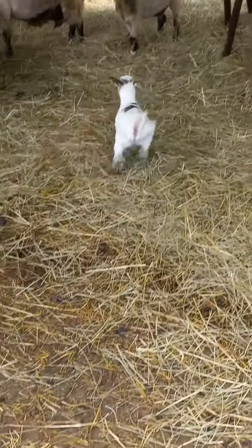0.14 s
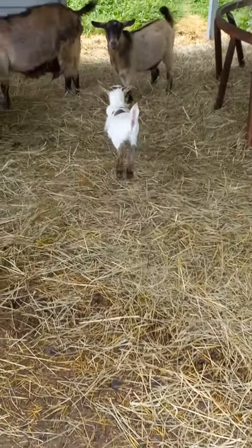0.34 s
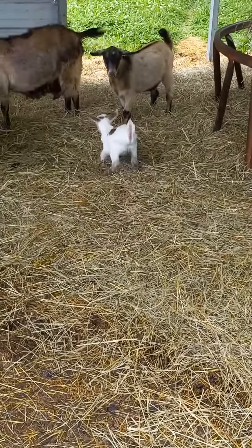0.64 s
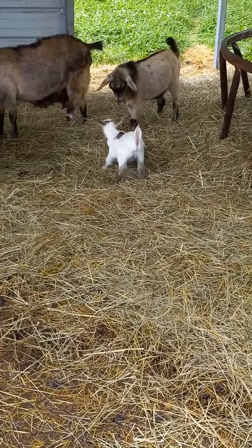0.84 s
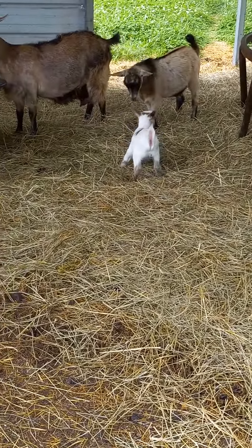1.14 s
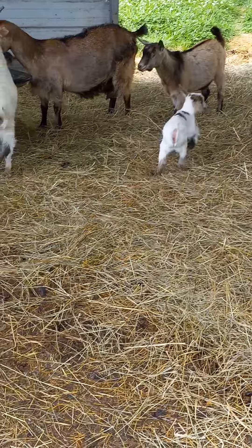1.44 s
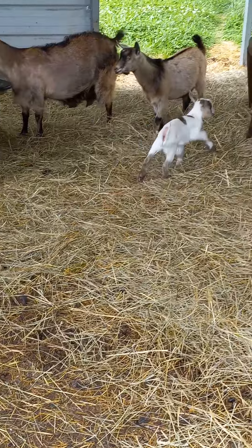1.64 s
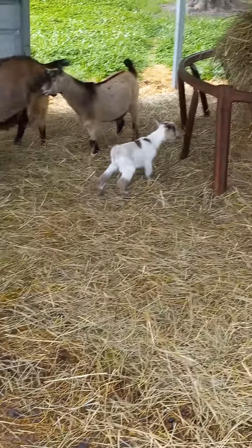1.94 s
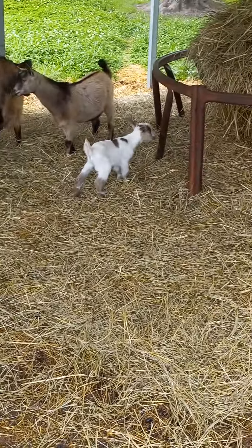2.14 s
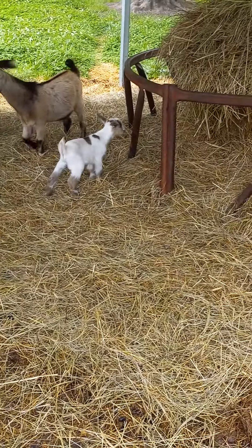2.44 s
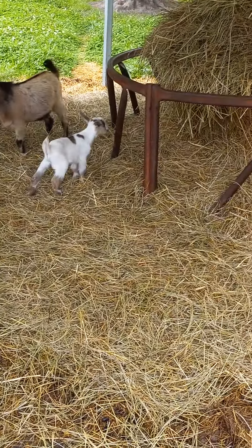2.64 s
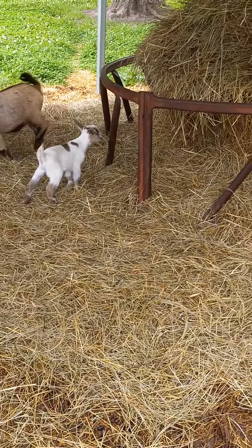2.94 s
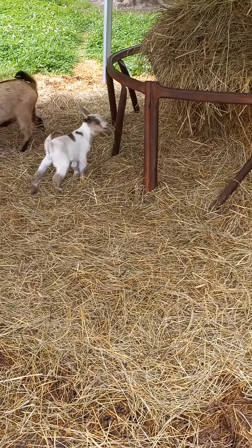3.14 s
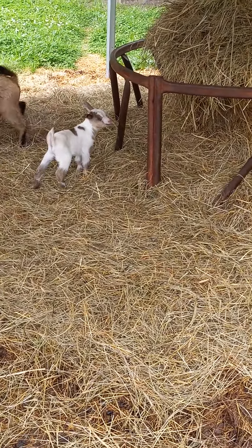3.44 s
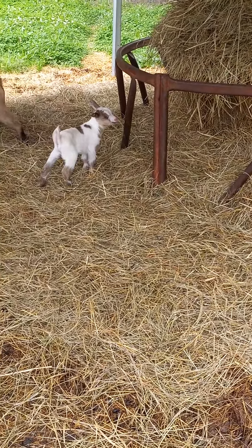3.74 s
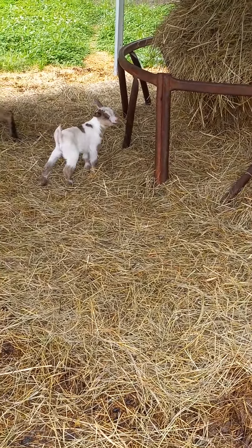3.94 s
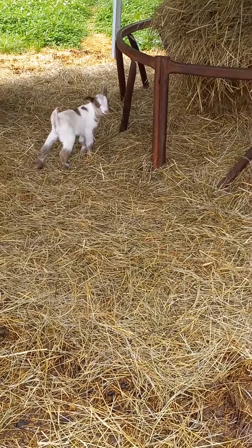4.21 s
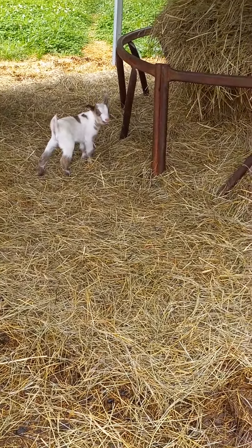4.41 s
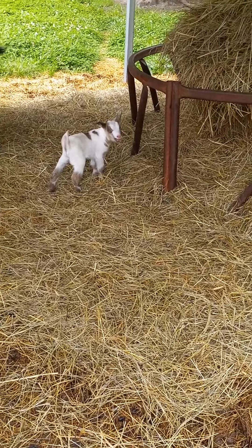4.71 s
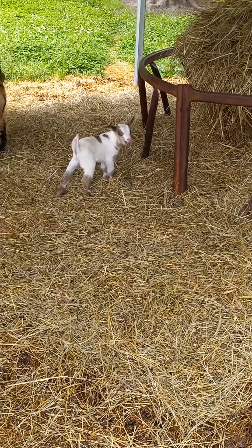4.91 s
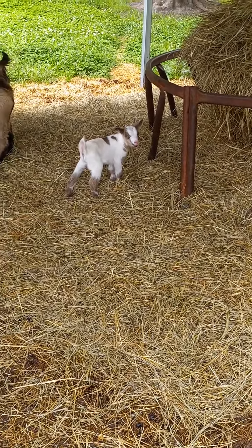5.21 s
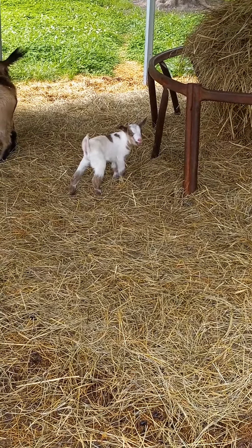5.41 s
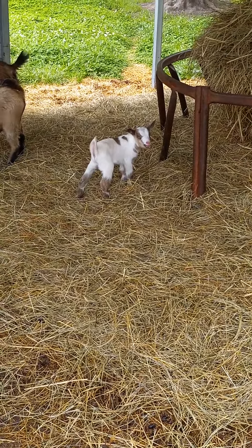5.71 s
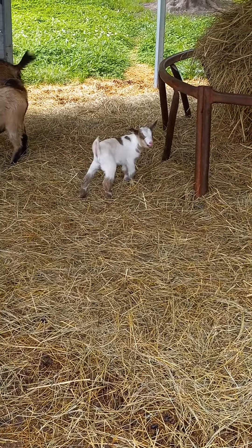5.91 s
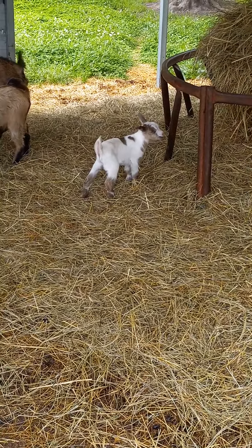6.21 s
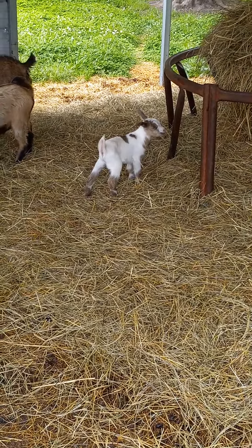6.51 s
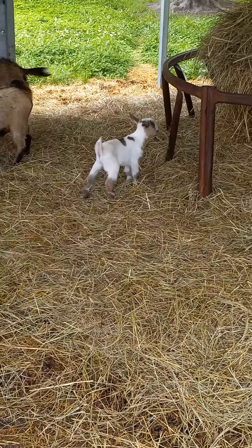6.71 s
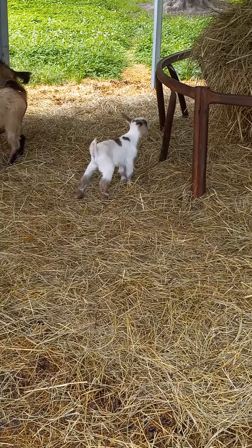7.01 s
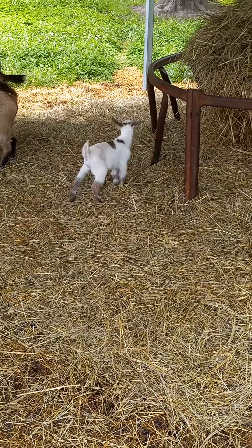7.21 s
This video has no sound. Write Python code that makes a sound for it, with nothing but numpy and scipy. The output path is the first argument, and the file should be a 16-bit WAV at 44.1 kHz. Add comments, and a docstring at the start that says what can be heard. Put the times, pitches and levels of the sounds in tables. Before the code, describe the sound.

A baby goat bleats twice in a high, quavering voice after dull thumps and rustling on straw, with faint birds and light wind puffs.

```python
"""A goat kid runs off across a straw-floored shelter: trodden straw rustles, the floor thumps dully,
stalks scuff. Throughout, puffs of air catch the two microphone ports in turn.
From about 3 s birds call faintly outside. At 4 s and 5.2 s the kid bleats, high and quavering,
about ten throbs a second: partials shaped by the mouth, rough where the voice sags."""
import sys
import numpy as np
from scipy import signal
from scipy.fft import rfft, irfft
from scipy.io import wavfile
from scipy.ndimage import uniform_filter1d, map_coordinates

SR = 44100
rng = np.random.default_rng(int(sys.argv[2]) if len(sys.argv) > 2 else 0)


def to_wav(s):
    """Save 16-bit WAV."""
    ch = np.atleast_2d(s).T  # columns
    pcm = np.round(np.clip(ch, -1, 1) * 32767)  # PCM
    wavfile.write(sys.argv[1], SR, pcm.astype(np.int16))


N = 324128
TIME = np.arange(N) / SR

# straw hiss spectrum: f/Hz, density/dB
HISS_SPECTRUM = [(2000, -5.5), (4000, 3.5), (6500, 6), (8700, 1), (11000, 2), (13500, 6.5), (16000, 2)]


def from_db(db):
    """Decibels to gain."""
    return 10 ** (np.asarray(db) / 20)


def rms_one(x):
    """Scale to unit power."""
    return x / np.sqrt(np.mean(x ** 2) + 1e-20)


def at_hz(points, hz):
    """Read a spectrum on a log-frequency axis."""
    f, value = np.transpose(points)
    return np.interp(np.log(np.maximum(hz, 1)), np.log(f), value)


def in_time(rows, t):
    """Read each column of a curve at times t."""
    s, *columns = np.transpose(rows)
    return [np.interp(t, s, c) for c in columns]


def drift(rate_hz, size=N):
    """Smooth random curve, spread about 1."""
    knots = rng.standard_normal(size // 8 + 4)
    return map_coordinates(knots, [np.arange(size) * min(rate_hz / SR, 1 / 8)], order=2, mode="wrap")


def coloured(spectrum, correlation, size=N):
    """Unit-power stereo noise of given spectrum and left-right correlation."""
    gain = from_db(at_hz(spectrum, np.fft.rfftfreq(size, 1 / SR)))
    mid, side = irfft(rfft(rng.standard_normal((2, size))) * gain, size)
    return rms_one(np.sqrt(1 + correlation) * mid + np.sqrt(1 - correlation) * side * [[1], [-1]])


def butter(x, kind, hz, order=2):
    """Butterworth filter."""
    return signal.sosfilt(signal.butter(order, hz, kind, fs=SR, output="sos"), x)


def resonance(x, hz, width_hz):
    """Two-pole resonance, peak gain 1."""
    r = np.exp(-np.pi * width_hz / SR)
    feedback = [1, -2 * r * np.cos(2 * np.pi * hz / SR), r * r]
    return signal.lfilter(np.array([1, 0, -1]) * (1 - r * r) / 2, feedback, x)


def add(track, s, sound):
    """Mix a sound in at time s."""
    at = max(round(s * SR), 0)
    track[:, at:at + sound.shape[-1]] += sound[..., :N - at]


def panned(x, pan_db):
    """Share power; pan_db is left over right."""
    return x * rms_one(from_db([[pan_db / 2], [-pan_db / 2]]))


def at_ports(x, pan_db, lag_s=.0001):
    """Sound from the pen reaches the left port first."""
    left, right = x
    late_right = map_coordinates(right, [np.arange(N) - lag_s * SR], order=3)
    return panned(np.array([left, late_right]), pan_db)


def straw(shuffle_follows=0.59, usual_tread_db=-48.5):
    """Trodden bedding: low shuffle and grainy rustle swell together; a fine hiss swishes unevenly."""
    # treading strength: t/s, level/dB
    treading = [(0, -50.5), (.2, -47), (.48, -49), (.8, -36.5), (1.03, -23), (1.15, -32.5), (1.33, -34.5),
                (1.48, -49.5), (1.72, -44), (2.12, -56.5), (2.85, -49), (3.96, -45.5), (4.4, -42.5),
                (5.12, -60), (6.0, -57), (6.48, -52), (6.85, -59), (7.35, -37)]
    # hiss envelope: t/s, level/dB
    hiss_level = [(0, -44.5), (.14, -41), (.43, -49), (.68, -43), (.87, -46.5), (1.01, -30), (1.12, -48.5),
                  (2.3, -53.5), (3.55, -40), (3.75, -44.5), (5.1, -50.5), (6.8, -52), (7.35, -46.5)]
    # spectra: f/Hz, density/dB
    shuffle_spectrum = [(70, -36), (130, -11), (200, -8), (300, 2), (420, -5), (600, -3.5), (900, -10),
                        (1400, -20.5), (2500, -46)]
    rustle_spectrum = [(500, -11.5), (1000, 1.5), (2000, -0.5), (3200, -3), (5000, -8.5), (7000, -14.5),
                       (8500, -34), (15000, -26)]
    tread_db, = in_time(treading, TIME)
    shuffle_db = -44.5 + shuffle_follows * (tread_db - usual_tread_db) + 2 * drift(25)
    shuffle = from_db(shuffle_db) * coloured(shuffle_spectrum, 0.53)
    rustle_db = tread_db - 1 + 1.2 * drift(45) + 2 * drift(300)
    rustle = from_db(rustle_db) * coloured(rustle_spectrum, 0.12)
    hiss_db = in_time(hiss_level, TIME)[0] - 2 + 2.5 * drift(8.9) + drift(320)
    hiss = from_db(hiss_db) * coloured(HISS_SPECTRUM, 0.057)
    return at_ports(shuffle + rustle, pan_db=-0.62) + panned(hiss, pan_db=0.46)


def air(gust_db=5, eddy_hz=76.7, rise_s=0.015, puff_gain_db=3):
    """Eddies bump each port on its own, over a faint draught."""
    # draught envelope: t/s, level/dB
    draught = [(0, -42.5), (1.6, -37), (1.8, -54), (2.8, -55), (3.0, -44), (7.35, -40)]
    # strongest puffs: t/s, level/dB, pan/dB
    puffs = [(0.168, -26.5, -15), (0.578, -16, -2), (0.996, -19, 1.0), (2.033, -26.5, 5), (3.3, -16, 3),
             (3.537, -25, -2), (3.805, -26, -29), (4.328, -17, 2), (4.726, -19, -0.5), (4.822, -20.5, -2),
             (5.005, -20, 0), (6.041, -23.5, 6), (6.521, -24, -10), (7.03, -18.5, 6)]
    # eddy spectrum: f/Hz, density/dB
    eddy = [(20, -38), (45, -17), (eddy_hz, 0), (1.45 * eddy_hz, -4), (220, -16), (400, -30),
            (1000, -55), (4000, -90)]
    gusts_db = gust_db * np.array([drift(5.4), drift(5.5)])
    out = from_db(in_time(draught, TIME)[0] + gusts_db) * coloured(eddy, 0)
    t = TIME[:SR // 4]
    swell = t / rise_s * np.exp(1 - t / rise_s)
    for s, db, pan_db in puffs:
        puff = coloured(eddy, 0, len(t)) * swell
        puff /= np.abs(puff).max(axis=1, keepdims=True)
        add(out, s, panned(puff * from_db(db + puff_gain_db), pan_db))
    return out


def floor_boom(force):
    """Floor response to a force, power 1 at its loudest."""
    # floor modes: f/Hz, width/Hz, level/dB
    modes = [(90, 7.8, -21), (200.2, 7.8, 0.5), (230.5, 19.6, -1.5), (292.8, 34, 4), (365, 24, -45),
             (538, 20, -7.5), (760, 47, -52)]
    boom = sum(from_db(db) * resonance(force, hz, width) / np.sqrt(width) for hz, width, db in modes)
    return boom / np.sqrt(uniform_filter1d(boom ** 2, size=1100).max())


def thumps(grain_db=3, push_s=0.0016, rebound=0.89, split_hz=910, body_fade=0.71, crackle_fade=0.25):
    """Weight lands and rebounds on packed straw: stalks crunch, the floor booms and rumbles on."""
    # landings: t/s, rise/s, hold/s, thud/dB, crunch/dB, fade/s
    landings = [(0.091, 0.0062, 0.0145, -31.5, -43, 0.41), (0.535, 0.00056, 0.015, -13, -18, 0.15),
                (0.677, 0.021, .022, -11, -27, 0.23), (0.974, 0.00874, 0.016, -9.5, -18, 0.3),
                (1.334, 0.0013, 0.021, -19, -29, 0.4), (1.512, 0.0032, 0.016, -22.5, -34.5, 0.35),
                (1.633, 0.015, 0.047, -33, -43, 0.12), (2.869, 0.0016, 0.0257, -19.5, -18, 0.43),
                (4.296, 0.0097, 0.0088, -38, -21.5, 0.05), (4.529, 0.0022, 0.0032, -44.5, -27, 0.025),
                (7.281, .014, 0.021, -23, -31, 0.11)]
    # crushed stalks: f/Hz, density/dB
    crunch_spectrum = [(200, -47), (450, 9.5), (800, 7.5), (1200, 7), (1800, -2.5), (2400, 1),
                       (3500, -10.5), (6000, -15), (8500, -60), (15000, -43)]
    out, t = np.zeros((2, N)), TIME[:SR // 2]
    for s, rise_s, hold_s, thud_db, crunch_db, fade_s in landings:
        fading = np.maximum(t - rise_s - hold_s, 0) / fade_s
        press = np.minimum(t / rise_s, 1) ** 2
        push = np.exp(-(2 * (t - rise_s - push_s) / push_s) ** 2)
        push += rebound * np.exp(-(2 * (t - rise_s - hold_s * 0.866) / push_s) ** 2)
        rumble = floor_boom(rng.standard_normal(SR))[-len(t):]
        rumble /= np.sqrt(uniform_filter1d(rumble ** 2, size=1500))
        rumble *= press * from_db(-6 - 35 * fading)
        add(out, s, from_db(thud_db - 1) * (floor_boom(push) + rumble))
        crunch = coloured(crunch_spectrum, 0.43, len(t)) * from_db(grain_db * drift(537, len(t)) - 1)
        body = butter(crunch, "low", split_hz)
        for part, fade_share in ((body, body_fade), (crunch - body, crackle_fade)):
            add(out, s, press * from_db(crunch_db - 60 * fading / fade_share) * part)
    out = at_ports(out, pan_db=-1.3)
    return out + shelter(out, early_db=-15, late_db=-16, early_s=.02)


def shelter(x, early_db, late_db, early_s):
    """Quick scatter off floor, posts and roof, then a thin tail that dies fastest in the treble."""
    # reverberation: f/Hz, T60/s
    t60 = [(150, 0.51), (600, 0.86), (2000, 0.65), (5000, 0.48), (9000, 0.43), (16000, 0.1)]
    t = TIME[:SR // 2]
    white, tail = rng.standard_normal((2, len(t))), 0
    edges_hz = np.geomspace(80, 17000, 9)
    for low, high in zip(edges_hz, edges_hz[1:]):
        tail += butter(white, "band", [low, high]) * from_db(-60 * t / at_hz(t60, np.sqrt(low * high)))
    early = rng.standard_normal((2, len(t))) * np.exp(-t / early_s) * (t > .003)
    response = from_db(early_db) * rms_one(early) + from_db(late_db) * rms_one(tail * (t > .012))
    return signal.fftconvolve(x, response / np.sqrt(len(t)), axes=1)[:, :N]


def scuffs(grain_db=4, rise_s=0.0054):
    """Stalks slide and snap over one another in short bursts."""
    # bursts: t/s, length/s, scrape/dB, snap/dB
    bursts = [(0.416, 0.015, -41.5, -62), (2.229, 0.011, -43, -55), (2.582, 0.028, -47, -50),
              (2.708, 0.0074, -39, -35.5), (3.788, 0.017, -37, -41.5), (3.854, 0.011, -34, -39),
              (6.209, 0.057, -45.5, -52.5), (6.432, 0.038, -40, -49), (6.481, 0.072, -33.5, -56)]
    # sliding stalks: f/Hz, density/dB
    scrape_spectrum = [(240, -32), (400, -4), (816, 0), (1160, -1), (2150, -1), (3050, -4), (6820, -17),
                       (9230, -29), (15000, -41)]
    out, t = np.zeros((2, N)), TIME[:SR // 4]
    for s, length_s, scrape_db, snap_db in bursts:
        envelope = np.minimum(t / rise_s, 1) * np.exp(-(t / length_s) ** 2)
        scrape = from_db(scrape_db) * coloured(scrape_spectrum, 0.25, len(t))
        snap = from_db(snap_db) * coloured(HISS_SPECTRUM, .1, len(t))
        add(out, s, from_db(grain_db * drift(616, len(t))) * envelope * (scrape + snap))
    return out + shelter(out, early_db=-4, late_db=-17, early_s=0.015)


def birds():
    """Thin gliding whistles from the pasture."""
    # notes: t/s, length/s, start/Hz, middle/Hz, end/Hz, level/dB
    notes = [(2.83, 0.017, 5300, 6550, 7550, -33.5), (4.247, 0.013, 5750, 6400, 7440, -23),
             (5.831, 0.063, 2950, 2905, 2800, -46), (6.275, 0.22, 2560, 3122, 2910, -44.5),
             (6.808, 0.082, 2820, 2440, 2360, -49.5), (7.011, 0.053, 2970, 3386, 2770, -39.5),
             (7.044, 0.1, 2850, 2420, 2500, -44.5)]
    out = np.zeros((2, N))
    for s, length_s, *glide_hz, db in notes:
        u = np.linspace(0, 1, round(length_s * SR))
        hz = np.polyval(np.polyfit([0, .5, 1], glide_hz, 2), u)
        add(out, s, from_db(db) * np.sin(np.pi * u) * np.sin(2 * np.pi * np.cumsum(hz) / SR))
    return out + shelter(out, early_db=-5, late_db=-7, early_s=.02)


def throbs_of(effort, first_s, end_s, first_length_s, settled_length_s=.113, settle_throbs=2.7):
    """Throbs lengthen and deepen as they settle. Returns t/s, crest/Hz, dip/Hz, crest/dB, dip/dB."""
    unsettled = np.exp(-np.arange(12) / settle_throbs)
    lengths_s = settled_length_s + (first_length_s - settled_length_s) * unsettled
    s = first_s + np.cumsum(lengths_s) - lengths_s
    s, unsettled = s[s < end_s], unsettled[s < end_s]
    crest_hz, crest_db = in_time(effort, s)
    drop_hz = np.interp(unsettled, [0, 1], [43.94, 22.06])
    drop_db = np.interp(unsettled, [0, 1], [21, 10])
    drop_hz[-1], drop_db[-1] = 68.9, 15.5   # last throb slides down as the voice gives out
    return s, crest_hz, crest_hz - drop_hz, crest_db, crest_db - drop_db


def quaver(throbs, start_s, start_hz, end_s, release_s, t, step_hz=19, break_hz=35.9, drop_s=.013):
    """Each throb climbs in two steps as it swells, breaks downward, fades. Returns pitch/Hz, level/dB."""
    pitch, level = [(start_s, start_hz)], [(start_s, -47)]
    crests_s = [start_s, *throbs[0], end_s + drop_s]
    for s, crest_hz, dip_hz, crest_db, dip_db, last_s, next_s in zip(*throbs, crests_s, crests_s[2:]):
        climb_s, dip_s = s - last_s, s + .42 * (next_s - s)
        pitch += [(s - .42 * climb_s, crest_hz - step_hz), (s - .22 * climb_s, crest_hz - step_hz * .85)]
        pitch += [(s - .03 * climb_s, crest_hz), (s + .003, crest_hz)]
        pitch += [(s + drop_s, max(dip_hz, crest_hz - break_hz)), (dip_s, dip_hz)]
        level += [(s - .029, crest_db - 5), (s + .0041, crest_db), (dip_s, dip_db)]
    level += [(end_s - drop_s, dip_db), (end_s + release_s, -65)]
    curves = [np.interp(t, *np.transpose(sorted(points))) for points in (pitch, level)]
    return [uniform_filter1d(curve, size=200) for curve in curves]


def bleat(effort, start_s, first_s, end_s, first_length_s, start_hz, roughness):
    """Partials shaped by the mouth: clear and bright at each crest, rough and dull in the sags."""
    # partial strengths, mouth open and nearly shut: f/Hz, level/dB
    open_mouth = [(560, -23), (1100, -14), (1500, -9.5), (1760, 6), (2200, -10), (2800, -14), (3500, -11),
                  (4400, -1.5), (5100, -8), (6100, -6.5), (7500, -4.5), (9000, -23.5), (10500, -30),
                  (14500, -33.5)]
    shut_mouth = [(560, 10), (1100, -7.5), (1700, -5), (2700, -3), (3400, -9.5), (4500, 0.5), (5600, -6),
                  (7700, -2), (10000, -21.5), (14500, -23)]
    # mouth opening: t/s, open/0-1
    mouth = [(4.13, 0.35), (4.21, 0), (4.3, 0), (4.39, 0.5), (4.49, 0.87)]
    slack_hz, bright_from_hz, release_s = 558, 9200, 0.018
    jitter, shimmer, rasp_db = 0.0249, .4, -7
    t = start_s + TIME[:SR]
    throbs = throbs_of(effort, first_s, end_s, first_length_s)
    pitch_hz, level_db = quaver(throbs, start_s, start_hz, end_s, release_s, t)
    crest_hz, crest_db = in_time(effort, t)
    opening, = in_time(mouth, t)
    sag_db = np.maximum(crest_db - level_db - 6, 0)
    rough = np.clip(roughness + 0.005 * np.maximum(slack_hz - crest_hz, 0) + 0.19 * sag_db, 0, 1)
    phase = 2 * np.pi * np.cumsum(pitch_hz * (1 + jitter * (rough + .05) * drift(500, SR))) / SR
    voice = 0
    for k in range(1, 29):
        hz = k * pitch_hz
        colour_db = opening * at_hz(open_mouth, hz) + (1 - opening) * at_hz(shut_mouth, hz)
        colour_db += np.clip(hz / bright_from_hz - 1, 0, .5) * 2 * (4 - 1.3 * sag_db)
        wander_db = 4.5 * min(k / 10, 1) * drift(36.3, SR)
        throat_phase = rng.uniform(0, 2 * np.pi)   # uneven delays smear each pulse
        voice += from_db(colour_db + wander_db) * np.sin(k * phase + throat_phase)
    voice /= np.sqrt(uniform_filter1d(voice ** 2, size=600) + 1e-9)
    spurts = coloured(open_mouth, 1, SR)[0] * (1 + np.cos(phase))   # air escapes once a cycle
    rasp = from_db(rasp_db) * np.sqrt(rough) * butter(spurts, "high", 4000, order=4)
    voice *= 1 + shimmer * rough * drift(400, SR)
    return (voice + rasp) * from_db(level_db) * (t < end_s + release_s)


def kid(gain_db=-2, wall_delay_s=0.04):
    """Two bleats; treble scatters under the roof, a dull echo returns from the far wall."""
    # effort at the quaver crests: t/s, pitch/Hz, level/dB
    first_effort = [(4.13, 494.7, -25), (4.21, 563, -20), (4.301, 575.3, -12), (4.481, 593.5, -11),
                    (4.59, 565, -14.5), (4.789, 555, -15.5), (4.92, 573.3, -14)]
    second_effort = [(5.274, 562, -14.5), (5.361, 590, -11.5), (5.521, 589.3, -12.5), (5.649, 562, -15.5),
                     (5.76, 533, -16)]
    # bleats: start/s, first crest/s, end/s, first throb length/s, start pitch/Hz, roughness/0-1
    calls = [(4.075, 4.128, 4.995, .078, 431.3, .08), (5.231, 5.276, 5.83, .083, 503.5, 0.06)]
    out = np.zeros((2, N))
    for effort, call in zip((first_effort, second_effort), calls):
        add(out, call[0], bleat(effort, *call))
    out = at_ports(out, pan_db=-0.9) * from_db(gain_db)
    roof = shelter(butter(out, "high", 3200), early_db=-2, late_db=-20, early_s=0.017)
    echo = np.roll(butter(out, "low", 2500), round(wall_delay_s * SR), axis=1)
    return out + roof + shelter(echo, early_db=-24, late_db=-25, early_s=.03)


def scene():
    """Everything heard in the pen."""
    return straw() + air() + thumps() + scuffs() + birds() + kid()


def record(dry, cutoff_hz=15900):
    """Clip at full scale, then low-pass steeply."""
    lowpass = signal.ellip(10, .1, 80, cutoff_hz, fs=SR, output="sos")
    return signal.sosfilt(lowpass, np.clip(dry, -1, 1))


dry = scene()
out = record(dry)
to_wav(out)
```